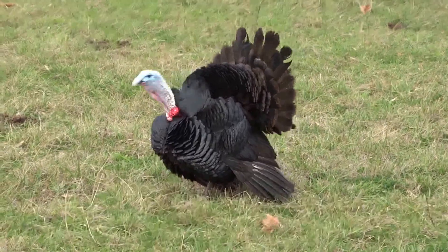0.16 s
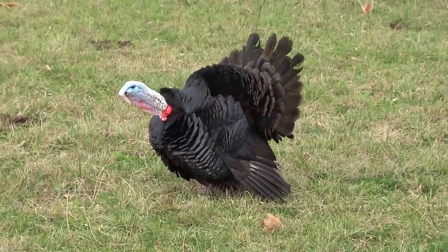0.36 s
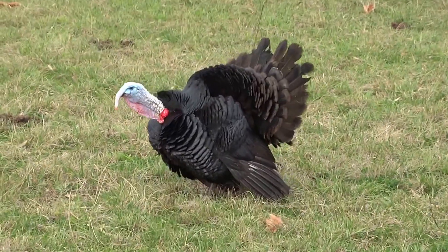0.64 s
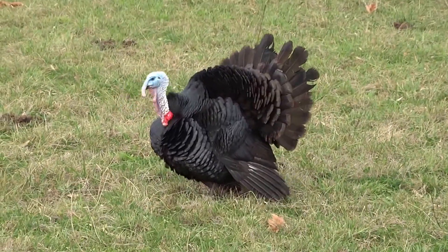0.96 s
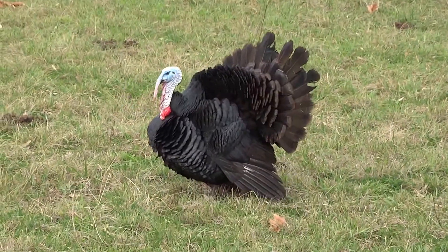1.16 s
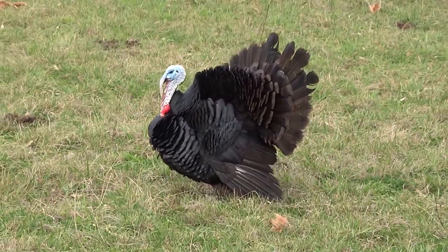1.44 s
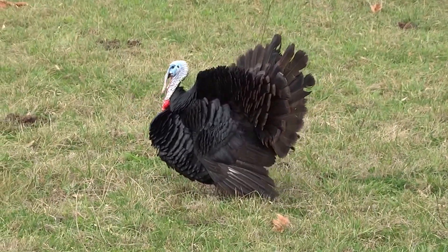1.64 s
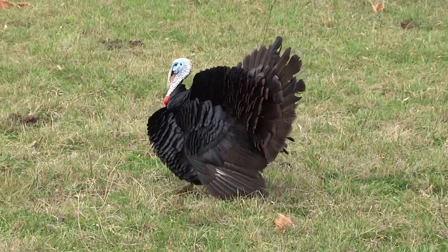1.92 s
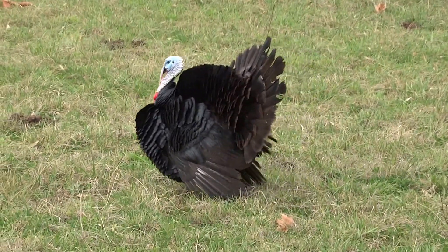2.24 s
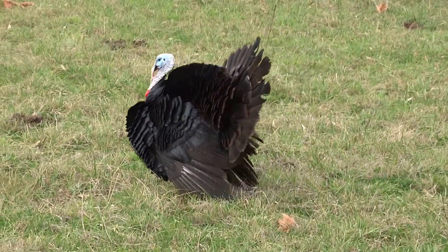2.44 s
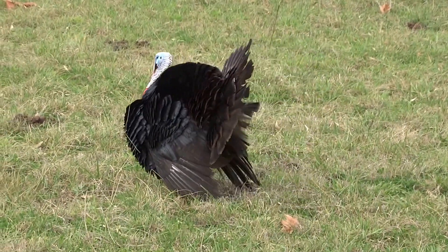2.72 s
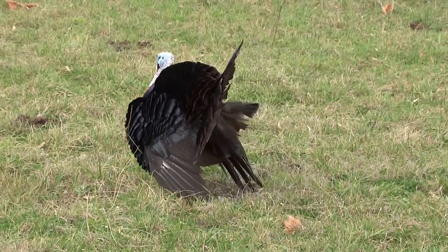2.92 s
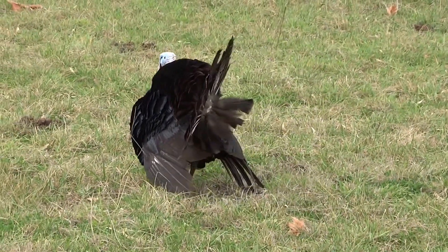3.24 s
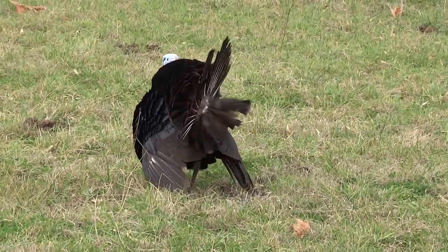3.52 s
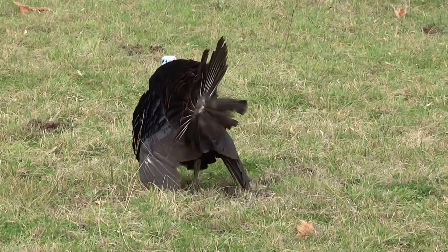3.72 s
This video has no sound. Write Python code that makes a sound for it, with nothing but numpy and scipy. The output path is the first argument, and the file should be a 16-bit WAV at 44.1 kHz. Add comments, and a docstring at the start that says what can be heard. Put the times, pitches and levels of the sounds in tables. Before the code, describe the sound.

Loud fast turkey gobble fading within a second, followed by faint rustling and distant poultry clucks.

```python
"""From the start: low rumble and hiss (shaped noise), faint tones, grass and feathers rustling in gusts (grains),
far poultry clucking (short glides). At once a turkey gobbles: fast throaty syllables, harmonics through a moving
throat resonance and the beak, with an outdoor echo (decaying noise). Then dry stalks snap (decaying noise bursts),
a far whistle and a drawn-out cry sound (wavering partials), grass scuffs (noise swells), hoarse squawks come from
afar (phase-shaken glides), and last a small bird chirps (rising and falling glides)."""
import sys
import numpy as np
from scipy import signal
from scipy.fft import rfft, irfft, next_fast_len
from scipy.io import wavfile
from scipy.ndimage import uniform_filter1d

SR = 44100
rng = np.random.default_rng(int(sys.argv[2]) if len(sys.argv) > 2 else 0)


def volts_from_decibels(level):
    """Turn decibel levels (scalar or array-like) into linear amplitude factors."""
    exponent = np.asarray(level, float) / 20
    return 10 ** exponent


def wav_out(sig):
    """Save sig, one row per channel (or a flat mono array), as 16-bit PCM at SR to the path in sys.argv[1]."""
    wavfile.write(sys.argv[1], SR, np.round(np.clip(np.atleast_2d(sig).T, -1, 1) * 32767).astype(np.int16))


N = 170667
TIME_S = np.arange(N) / SR
NOTE_ROUND = .6   # envelope exponent: 1 = half-sine swell, less = squarer


def rms_one(x):
    """Scales to rms 1."""
    return x / np.sqrt(np.mean(x ** 2) + 1e-20)


def in_time(rows):
    """Interpolates each column of a table over time."""
    s, *columns = np.transpose(rows)
    return [np.interp(TIME_S, s, c) for c in columns]


def at_hz(points, hz):
    """Interpolates a (Hz, dB) table over log frequency."""
    table_hz, table_db = np.transpose(points)
    return np.interp(np.log(hz), np.log(table_hz), table_db)


def drift(rate_hz):
    """White noise twice through a one-pole low-pass, run in; rms 1."""
    r = np.exp(-2 * np.pi * rate_hz / SR)
    return rms_one(signal.lfilter([1], [1, -2 * r, r * r], rng.standard_normal(N + SR))[SR:])


def colour(x, spectrum):
    """Shapes a noise by a (Hz, dB) table; rms 1."""
    size = next_fast_len(N)
    hz = np.arange(size // 2 + 1) * SR / size + 1
    return rms_one(irfft(rfft(x, size) * volts_from_decibels(at_hz(spectrum, hz)), size)[:N])


def band(x, low_hz, high_hz):
    """Butterworth band-pass."""
    return signal.sosfilt(signal.butter(2, [low_hz, high_hz], "band", fs=SR, output="sos"), x)


# Rumble and hiss spectrum. Each row: frequency in Hz, relative density in dB per Hz.
AIR_SPECTRUM = [(25, -26), (32, -17.5), (50, -15.5), (64, -11), (80, -5), (95, 3), (115, -2), (135, -4),
                (160, -13), (210, -10.5), (260, -16), (400, -22.5), (700, -22.5), (860, -22.5), (1000, -33),
                (1700, -29.5), (2300, -35), (3300, -38), (4200, -48.5), (6000, -52.5), (8000, -55.5),
                (11000, -90), (15500, -98.5)]
# Faint tones. Each row: frequency in Hz, relative level in dB.
HUM_TONES = [(590, -64), (736, -62), (834, -61)]
AIR_DB = -36


def air():
    """Shaped noise gives rumble and hiss; a few steady tones waver in level and phase."""
    tones = np.zeros(N)
    for hz, db in HUM_TONES:
        level = volts_from_decibels(db + 2 + 4.9 * drift(5.9))
        tones += level * np.sin(2 * np.pi * hz * TIME_S + 1.26 * drift(2.68))
    return volts_from_decibels(AIR_DB) * colour(rng.standard_normal(N), AIR_SPECTRUM) + tones


# Left-right difference of the air. Each row: frequency in Hz, relative density in dB per Hz.
AIR_SIDE_SPECTRUM = [(24, -47), (40, -34), (102, -17), (250, 2.5), (810, 6.5), (1100, -1.5), (1840, 0.5),
                     (4000, -9.5), (8700, -35), (10000, -27), (11000, -28), (14300, -60)]
AIR_SIDE_DB = -59.5


def air_side():
    """Independent shaped noise widens the air."""
    return volts_from_decibels(AIR_SIDE_DB) * colour(rng.standard_normal(N), AIR_SIDE_SPECTRUM)


# Gust strength. Each row: time in seconds, relative level in dB.
GUST_LEVEL = [(.8, -67), (1.1, -79.5), (1.25, -68.5), (1.38, -62.5), (1.6, -70), (1.65, -64.5),
              (1.72, -74.5), (1.9, -63.5), (2.05, -67), (2.15, -59.5), (2.28, -58.5), (2.45, -62),
              (2.52, -67.5), (2.8, -60), (3.0, -68), (3.25, -72), (3.4, -64.5), (3.6, -61.5), (3.75, -66.5),
              (3.87, -66.5)]
# Rustle spectrum. Each row: frequency in Hz, relative density in dB per Hz.
RUSTLE_SPECTRUM = [(1500, -3.5), (2500, -1.5), (4000, -4), (5500, -7.5), (7500, -2.5), (9000, -9.5),
                   (11000, -19.5), (15000, -42)]
RUSTLE_DB, GRAINS_PER_S, GRAIN_SPREAD_DB = 5, 2200, 4.5   # RUSTLE_DB adds to the gust level


def rustle():
    """Gusts set the level of dense random grains over a noise bed: grass and feathers."""
    gust_db, = in_time(GUST_LEVEL)
    hits = rng.random(N) < GRAINS_PER_S / SR
    sizes = volts_from_decibels(GRAIN_SPREAD_DB * np.minimum(rng.exponential(1, N), 5))
    grains = hits * sizes * rng.standard_normal(N)
    texture = colour(grains + 0.73 * rng.standard_normal(N), RUSTLE_SPECTRUM)
    return volts_from_decibels(gust_db + RUSTLE_DB + 1.7 * drift(13)) * texture


def glides(rows, octave_db, rough_rad):
    """Short gliding notes: rounded envelope, weak octave, phase shaken by rough_rad rms."""
    out, shake = np.zeros(N), rough_rad * drift(125)
    for s, length_s, start_hz, end_hz, db in rows:
        i, u = int(s * SR), np.linspace(0, 1, int(length_s * SR))
        note = slice(i, i + len(u))
        phase = 2 * np.pi * np.cumsum(start_hz + (end_hz - start_hz) * u) / SR + shake[note]
        wave = np.sin(phase) + volts_from_decibels(octave_db) * np.sin(2 * phase)
        out[note] += volts_from_decibels(db + 6) * np.sin(np.pi * u) ** NOTE_ROUND * wave
    return out


# Far clucks. Each row: start in seconds, length in seconds, start pitch in Hz, end pitch in Hz, relative level in dB.
CLUCK_NOTES = [(0.0, 0.032, 1422, 1374, -45.5), (1.03, 0.034, 1998, 2080, -51.5),
               (1.61, 0.035, 1717, 1485, -48.5), (1.98, 0.028, 894, 1040, -48.5),
               (2.285, 0.019, 905, 1140, -49), (2.57, 0.026, 855, 978, -48),
               (2.49, 0.063, 1595, 1438, -47.5), (2.772, 0.037, 1770, 1390, -43),
               (2.8, 0.048, 1333, 1236, -45.5), (2.805, 0.026, 1956, 1860, -51),
               (3.0, 0.036, 2780, 2860, -54), (3.078, 0.0385, 1724, 1430, -48),
               (3.11, 0.02, 1367, 1226, -49.5)]


def clucks():
    """Far poultry cluck: brief, rough glides."""
    return glides(CLUCK_NOTES, octave_db=-18, rough_rad=1.3)


PATCHY_DB, PATCHY_HZ = 5, 25   # rms spread of the gains; half the knot rate


def patches(count):
    """One slow random gain per harmonic, half shared with its neighbour, over the first second."""
    steps = 2 * PATCHY_HZ
    knots = rng.standard_normal((count, steps + 1))
    knots = rms_one(uniform_filter1d(knots, size=2, axis=0))
    place = np.arange(SR) / SR * steps
    return volts_from_decibels(PATCHY_DB * np.array([np.interp(place, np.arange(steps + 1), row) for row in knots]))


def unit_power(gains):
    """Scales the harmonics' gains to a power sum of 1 at each instant."""
    return gains / np.sqrt((gains ** 2).sum(0))


# The gobble. Each row: time in seconds, pitch in Hz, level in dB, throat resonance in Hz,
# beak opening as the upper voice's share in dB.
GOBBLE_TRACK = [(0.027, 446, -71, 1260, -14), (0.032, 423, -33.5, 1270, -10), (0.045, 457, -28, 1300, -1.5),
                (0.053, 621, -21, 1490, -8.5), (0.06, 573, -17.5, 1600, -5.5),
                (0.07, 509, -27.5, 1490, -0.5), (0.079, 488, -63, 1260.0, -31), (0.1, 591, -69, 1410.0, -7),
                (0.105, 626, -26.5, 1500, -15), (0.12, 792, -28.5, 1600.0, -35),
                (0.124, 710, -52, 1600.0, -26), (0.128, 572, -18, 1580, -25),
                (0.137, 621, -15.5, 1400, -22), (0.154, 626, -10, 1310, -33.5),
                (0.162, 685, -25, 1150, -17), (0.183, 707.6, -21, 950, -8), (0.189, 819, -22.5, 1150, -8),
                (0.202, 793, -28, 1156, -2), (0.209, 630, -24.5, 754, -7.5),
                (0.216, 543, -31.5, 1050.0, -15), (0.232, 600, -54, 1500.0, -8),
                (0.251, 549, -37, 1590, -11), (0.258, 553, -18, 1050, -14), (0.262, 685, -31.5, 1270, 2),
                (0.269, 672, -24, 1120, -1), (0.279, 554, -26.5, 920, -12),
                (0.29, 537.5, -43.5, 610.0, -1.5), (0.303, 591, -50, 1700, -6),
                (0.311, 552.6, -42, 1700, 7), (0.316, 537, -26, 1500, 7), (0.319, 543, -20.5, 1060, -41),
                (0.322, 543.6, -14, 1110, -22), (0.328, 603, -32, 1090, -10), (0.332, 595, -19, 1050, -8),
                (0.34, 531, -18, 1070, -24), (0.349, 537.4, -39, 1090.0, -10),
                (0.357, 721, -27, 1400.0, -9), (0.367, 675, -47, 1340.0, -13),
                (0.372, 590, -21.5, 1010, -6), (0.385, 665, -23.5, 1170, -2.5),
                (0.398, 678, -23.5, 1300, -3), (0.41, 642, -26, 1340, -3), (0.415, 535, -29, 870, -4),
                (0.428, 504, -43, 970, -28), (0.438, 559, -44, 1100.0, -8), (0.45, 573, -33, 1700, -17),
                (0.456, 550, -49, 1700, 17), (0.46, 515, -23.5, 1090, -12.5),
                (0.472, 516, -35, 1030.0, -17), (0.476, 596.4, -25.5, 1120, 0),
                (0.481, 516.5, -30, 790.0, -19), (0.496, 496, -50, 1020, 5), (0.502, 578, -28, 1750, -18),
                (0.512, 559, -32.5, 1670, -20), (0.516, 536, -21, 1070, -14.5), (0.524, 505, -24, 1010, -9),
                (0.534, 534, -26.5, 1050, -22), (0.548, 561, -18.5, 1194, -12.5),
                (0.569, 639.4, -21, 1380, 0), (0.588, 674.5, -24.5, 1460, -12),
                (0.604, 585, -26.5, 1150, 0.5), (0.615, 533, -37, 880, -36), (0.638, 595.6, -60, 1176, -14),
                (0.647, 621.7, -34.5, 1237, -6), (0.658, 463.3, -28.5, 928.4, -12.5),
                (0.662, 518, -39, 1100, -9), (0.667, 574, -27.5, 1313, -7), (0.681, 479.5, -43, 960, -7),
                (0.687, 433, -29, 880.5, -14), (0.691, 597, -44, 1200, -12), (0.697, 650, -34, 1290, -8),
                (0.713, 542, -26.5, 1090, -14.5), (0.724, 536.6, -56, 1049, -8),
                (0.779, 545, -50, 1077, -11), (0.786, 586, -32.5, 1360, -1),
                (0.796, 625, -34.5, 1588, -8.5), (0.812, 561, -35.5, 1310, -3),
                (0.821, 546.6, -55, 1210, -16), (0.846, 649, -48, 1255, -4), (0.854, 622, -40, 1240, -9),
                (0.866, 446.6, -29.5, 890, -8.5), (0.874, 401, -38, 830, -4), (0.882, 403, -50, 1070, -17)]
# Hoarseness. Each row: time in seconds, amount from 0 clear to 1 hoarse.
HOARSENESS = [(0, .12), (.13, .05), (.14, .04), (.182, .035), (.19, .25), (.22, .12), (.37, .07),
              (.382, .03), (.405, .03), (.415, .08), (.53, .07), (.545, .05), (.595, .025), (.61, .08)]
# Beak colour. Each row: frequency in Hz, relative level in dB.
BEAK_COLOUR = [(1500, -22), (1900, -0.5), (2300, -8), (2750, 13.5), (3200, 7), (3600, -21), (4100, -15.5)]
# Edge of the voice. Each row: frequency in Hz, relative level in dB.
EDGE_COLOUR = [(3300, -21), (4000, -9.5), (4700, 1), (5500, -8), (6800, -5), (8000, -11), (10000, -23),
               (13000, -39), (16000, -47)]
JITTER_RAD, JITTER_HZ = 1.1, 250   # rms phase wander when fully hoarse
THROAT_WIDTH_HZ, THROAT_SKIRT_DB = 434, -44   # width with the beak open
THROAT_CLOSED = 0.31   # share of that width with the beak shut
EDGE_DB, EDGE_REF_DB = -12.5, -18   # edge level, beak fully open, at this voice level
EDGE_PER_OPENING, EDGE_PER_EFFORT = 0.37, 0.34   # dB per dB of beak opening, of voice level
EDGE_DB_PER_OCTAVE, TAUT_HZ = 30, 650   # slack, low syllables lose their edge below this pitch


def gobble():
    """Harmonics of the gliding pitch pass a moving throat resonance and the beak; hoarseness shakes the cycles."""
    hz, db, throat_hz, open_db = (c[:SR] for c in in_time(GOBBLE_TRACK))
    hoarse, = in_time(HOARSENESS)
    phase = 2 * np.pi * np.cumsum(hz) / SR + JITTER_RAD * (hoarse * drift(JITTER_HZ))[:SR]
    k = np.arange(1, 30)[:, None]
    k_hz = k * hz
    share = np.clip(volts_from_decibels(open_db), 0, .97)
    width_hz = THROAT_WIDTH_HZ * (THROAT_CLOSED + (1 - THROAT_CLOSED) * share)
    resonance = 1 / (1 + ((k_hz - throat_hz) / width_hz) ** 2)
    throat = unit_power((resonance + volts_from_decibels(THROAT_SKIRT_DB)) * (k_hz < 2300))
    beak = unit_power(volts_from_decibels(at_hz(BEAK_COLOUR, k_hz)) * (k_hz > 1500) * (k_hz < 4200))
    edge = unit_power(volts_from_decibels(at_hz(EDGE_COLOUR, k_hz)) * (k_hz > 3300)) * patches(count=29)
    edge_db = EDGE_DB + EDGE_PER_OPENING * open_db + EDGE_PER_EFFORT * (db - EDGE_REF_DB)
    edge_db = edge_db + EDGE_DB_PER_OCTAVE * np.log2(np.minimum(hz / TAUT_HZ, 1))
    gains = throat * np.sqrt(1 - share ** 2) + beak * share + edge * volts_from_decibels(edge_db)
    n = np.arange(SR)
    sounding = (n > GOBBLE_TRACK[0][0] * SR) & (n < GOBBLE_TRACK[-1][0] * SR)
    harmonics = (gains * np.sin(k * phase + k ** 2)).sum(0)   # k**2 scatters the phases
    return np.pad(np.sqrt(2) * volts_from_decibels(db) * sounding * harmonics, (0, N - SR))


OFF_AXIS_DB, OFF_AXIS_CUT_HZ = -15, 1540


def off_axis(voice):
    """A phase-shifted, low-passed share of the voice sets left against right."""
    shifted = signal.hilbert(voice, next_fast_len(N))[:N].imag
    return volts_from_decibels(OFF_AXIS_DB) * signal.filtfilt(*signal.butter(1, OFF_AXIS_CUT_HZ, fs=SR), shifted)


ECHO_DB, ECHO_SIDE_DB, ECHO_T60_S = -20, -11, 0.42   # side is relative to mid
LATE_DB, LATE_T60_S = 10.5, 2.1   # far returns, against the near ones
ECHO_LOW_HZ, ECHO_CUT_HZ = 1320, 13000
ECHO_BRIGHT_DB, ECHO_BRIGHT_HZ = 1.5, (3880, 6400)   # the returns favour this band


def echo(x):
    """Scattered returns from the ground, then from far hedges and walls: mid and side."""
    t = TIME_S[:SR]
    decay = volts_from_decibels(-60 * t / ECHO_T60_S) + volts_from_decibels(LATE_DB - 60 * t / LATE_T60_S)
    tails = rng.standard_normal((2, SR)) * decay * (t > .004)
    bright = volts_from_decibels(ECHO_BRIGHT_DB) * band(tails, *ECHO_BRIGHT_HZ)
    tails = band(tails, ECHO_LOW_HZ, ECHO_CUT_HZ) + bright
    tails = tails / np.sqrt((tails ** 2).sum(1, keepdims=True))
    returns = signal.fftconvolve(x[None], tails, axes=1)[:, :N]
    return returns * volts_from_decibels([[ECHO_DB], [ECHO_DB + ECHO_SIDE_DB]])


# Snaps. Each row: time in seconds, relative level in dB.
STALK_SNAPS = [(1.339, -40), (1.383, -38), (2.118, -45), (2.2423, -34.5), (2.413, -29.5), (2.794, -40),
               (3.341, -36.5)]


def snaps():
    """Dry stalks snap: instant onset, fast decay, bright noise."""
    clicks = np.zeros(N)
    for s, db in STALK_SNAPS:
        clicks += volts_from_decibels(db - 3 - 60 * np.abs(TIME_S - s) / 0.034) * (TIME_S >= s)
    return clicks * rms_one(band(rng.standard_normal(N), 6000, 8440)) / 3


def far_call(rows, partials, rough_rad):
    """A held far call: partials of a gliding pitch, wavering in phase and each in level."""
    hz, db = in_time(rows)
    phase = 2 * np.pi * np.cumsum(hz) / SR + rough_rad * drift(52)
    sounding = (TIME_S > rows[0][0]) * (TIME_S < rows[-1][0])
    wave = sum(volts_from_decibels(g + 4 * drift(21)) * np.sin(k * phase) for k, g in partials)
    return volts_from_decibels(db + 1) * sounding * wave


# Far whistle. Each row: time in seconds, pitch in Hz, relative level in dB.
WHISTLE_TRACK = [(1.75, 1878, -61), (1.78, 1906, -50.5), (1.9, 1863, -52), (2.02, 1832, -57.5),
                 (2.1, 1804, -52)]
WHISTLE_OCTAVE_DB = -11.5


def whistle():
    """A far whistle: fundamental and a weaker octave."""
    return far_call(WHISTLE_TRACK, [(1, 0), (2, WHISTLE_OCTAVE_DB)], rough_rad=1)


# Far drawn-out cry. Each row: time in seconds, pitch in Hz, relative level in dB.
CRY_TRACK = [(1.81, 740, -73), (1.87, 726, -61), (2.0, 668, -60.5), (2.1, 624, -54.5), (2.25, 598.4, -55.5),
             (2.45, 585, -59.5), (2.6, 580, -64)]
# Its partials. Each row: multiple of the pitch, relative level in dB.
CRY_HARMONICS = [(2, 1), (3, 1), (4, 0), (5, -6), (6, -4)]


def cry():
    """A far falling cry carried by its upper partials."""
    return far_call(CRY_TRACK, CRY_HARMONICS, rough_rad=.36)


# Scuffs in the grass. Each row: start in seconds, length in seconds, level in dB.
GRASS_SCUFFS = [(1.872, 0.035, -51.5), (2.503, 0.068, -52), (2.68, 0.087, -52), (3.071, 0.068, -51.5),
                (3.24, 0.095, -52.5), (3.582, 0.039, -55)]
SCUFF_LOW_HZ, SCUFF_HIGH_HZ = 1600, 4700


def scuffs():
    """Grass scuffs: rounded swells of band-passed noise."""
    swell = np.zeros(N)
    for s, length_s, db in GRASS_SCUFFS:
        swell += volts_from_decibels(db) * np.sin(np.pi * np.clip((TIME_S - s) / length_s, 0, 1)) ** NOTE_ROUND
    noise = band(rng.standard_normal(N), SCUFF_LOW_HZ, SCUFF_HIGH_HZ)
    return swell * rms_one(band(noise, SCUFF_LOW_HZ, SCUFF_HIGH_HZ))   # twice: steeper skirts


# Far squawks. Each row: start in seconds, length in seconds, start pitch in Hz, end pitch in Hz, relative level in dB.
SQUAWK_NOTES = [(1.9, 0.044, 1733, 1470, -47), (2.2, 0.057, 1765, 1422, -44.5)]


def squawks():
    """Far hoarse squawks: falling glides, phase strongly shaken."""
    return glides(SQUAWK_NOTES, octave_db=-24, rough_rad=2.2)


# Small bird. Each row: start in seconds, length in seconds, start pitch in Hz, end pitch in Hz, relative level in dB.
CHIRP_NOTES = [(3.225, .03, 4600, 5500, -65), (3.505, .035, 4500, 5700, -65),
               (3.585, .025, 4550, 4450, -65)]


def chirps():
    """A small bird chirps: high, nearly pure glides."""
    return glides(CHIRP_NOTES, octave_db=-49, rough_rad=0.48)


FAR_WET_DB = 14   # far callers feed the returns this much more than the gobble does


def scene():
    """Sums the sources to mid and side, then left and right."""
    voice = gobble()
    far = clucks() + whistle() + cry() + squawks() + chirps()
    echo_mid, echo_side = echo(voice + volts_from_decibels(FAR_WET_DB) * far)
    mid = air() + rustle() + voice + far + echo_mid + snaps() + scuffs()
    side = air_side() + echo_side + off_axis(voice)
    side = side - volts_from_decibels(-34) * mid   # slight lean to the right
    return np.array([mid + side, mid - side])


def top_cut(x):
    """Nothing passes above the cut-off."""
    return signal.sosfilt(signal.butter(12, 15670, fs=SR, output="sos"), x)


def record(dry):
    """Delivers the finished mix."""
    return top_cut(dry)


dry = scene()
out = record(dry)
wav_out(out)
```